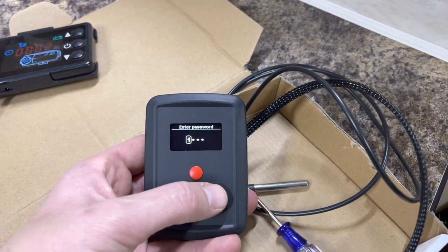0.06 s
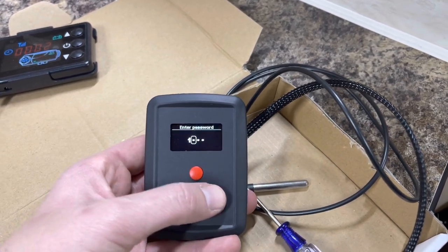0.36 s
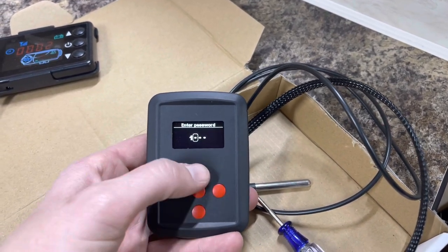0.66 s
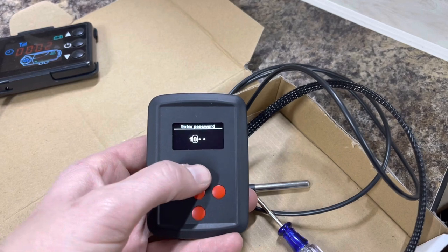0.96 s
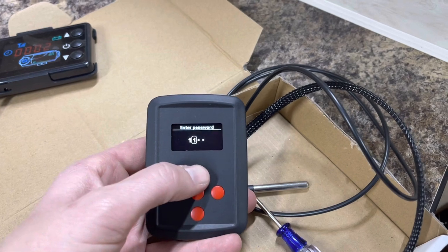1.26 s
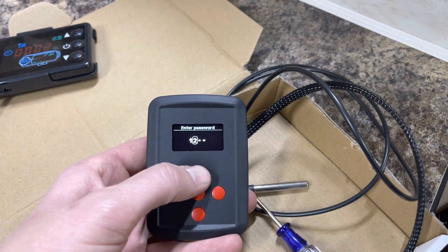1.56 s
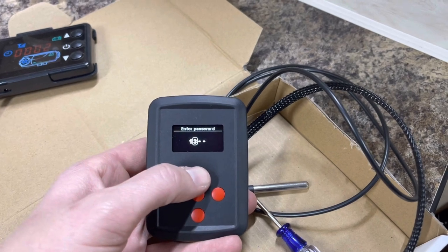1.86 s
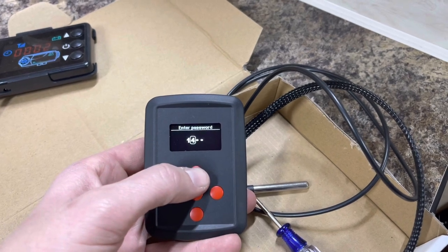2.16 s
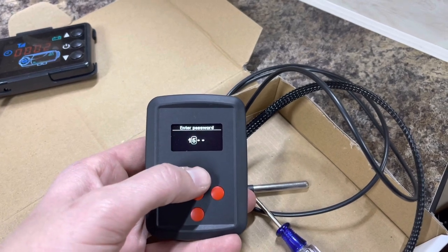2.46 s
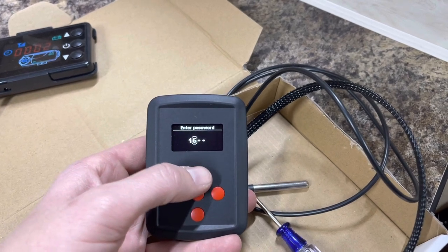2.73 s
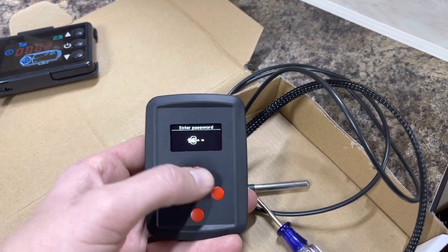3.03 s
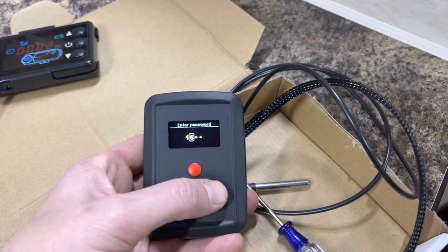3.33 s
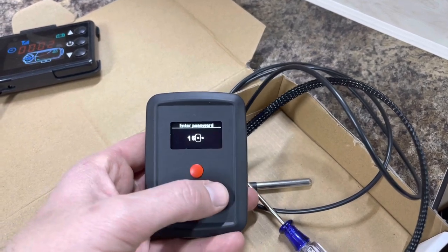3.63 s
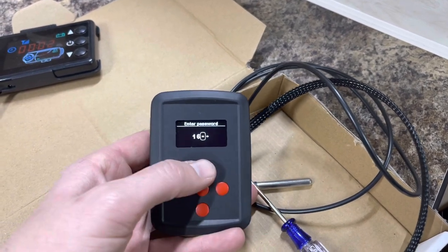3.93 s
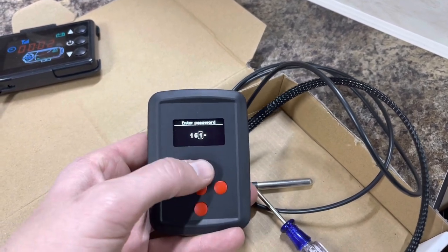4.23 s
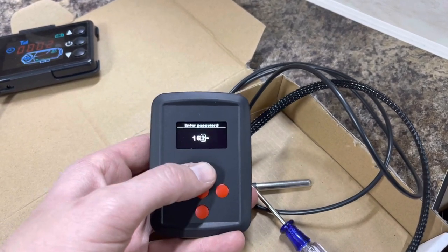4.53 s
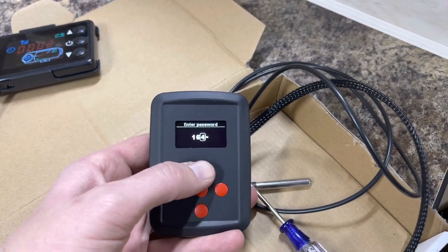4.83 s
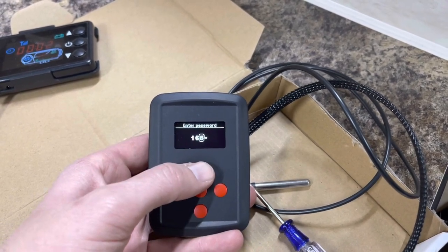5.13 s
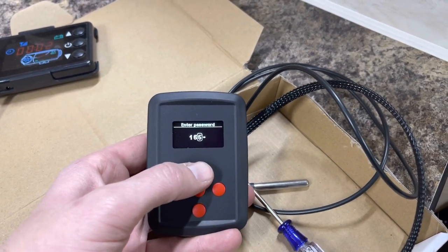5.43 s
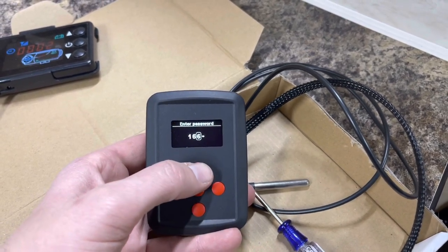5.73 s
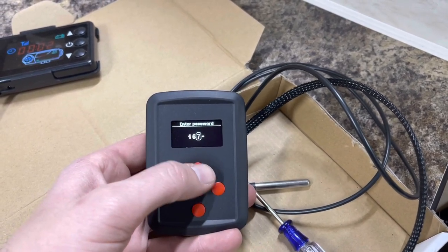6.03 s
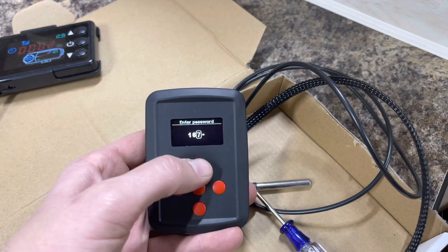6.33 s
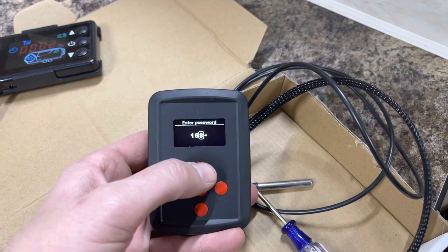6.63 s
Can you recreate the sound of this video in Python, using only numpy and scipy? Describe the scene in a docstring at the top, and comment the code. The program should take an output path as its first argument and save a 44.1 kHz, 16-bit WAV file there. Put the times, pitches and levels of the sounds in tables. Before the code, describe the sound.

A thumb works the small buttons of a handheld plastic controller, close to the microphone. A couple of softer clicks lead into a run of crisp press-and-release pairs. About halfway there is a short break with lighter clicks and faint finger rubbing, then a quicker run follows and slows toward the end. The clicks echo briefly in a small room over a faint, steady low machine hum.

```python
"""Small buttons click as a thumb works a handheld plastic controller above a cardboard sheet.
Under each button a metal dome flips: a snap, then a stop about a millisecond later.
Both strike the hollow case and make it ring, on the way down and on the way back up.
Between runs of clicks the thumb slides to another button and the fingers bump the shell.
The clicks echo briefly in a small room, which a low machine hum fills."""
import sys
import numpy as np
from scipy import signal
from scipy.fft import rfft, irfft, next_fast_len
from scipy.io import wavfile
from scipy.ndimage import uniform_filter1d

SR = 44100
rng = np.random.default_rng(int(sys.argv[2]) if len(sys.argv) > 2 else 0)


def to_wav(sig):
    """Store sig (one row per channel, or 1-D mono) as 16-bit WAV at the path in sys.argv[1].

    Samples outside -1..1 are clipped; the rate is SR.
    """
    pcm = np.clip(np.atleast_2d(sig), -1, 1) * 32767
    pcm = np.round(pcm).astype(np.int16)
    wavfile.write(sys.argv[1], SR, pcm.T)  # frames by channels


N = 303849
TIME = np.arange(N) / SR
CLICK_SAMPLES, RUB_SAMPLES = 4096, 16384

# The upper button going down: start_s, level_db, brightness_db_per_octave
BUTTON_PRESSES = [(.7217, -1.5, 0.6), (.9702, -5, -0.5), (1.2436, -3, -0.5), (1.5326, -2.5, -0.2),
                  (1.9044, -3, -0.5), (2.3002, -3.5, 0), (2.8804, -2.5, -0.4), (3.8783, -1.15, -0.3),
                  (4.1126, -2.1, -0.5), (4.3009, -2, 0), (4.529, -2.5, -1), (4.73, -2, -0.1),
                  (5.0681, -3.5, 0), (5.3766, -3.5, -0.5), (5.8485, -3, -0.3), (6.3898, -2.5, -0.6)]
# The upper button springing back: start_s, level_db, brightness_db_per_octave
BUTTON_RELEASES = [(.855, 1.3, 0.1), (1.102, -1.3, 1.4), (1.3397, 1.4, -0.54), (1.6713, -1, -0.85),
                   (2.0883, -1, -1.4), (2.4605, 0.8, 0.4), (3.003, 0.5, 1.95), (4.0193, -0.04, 0.1),
                   (4.2138, 2.5, 0.5), (4.431, .5, 1), (4.6436, 1.3, -0.8), (4.857, 1.3, 0.5),
                   (5.2267, -0.6, 0.5), (5.5089, 1.76, 0.4), (5.984, -0.5, 1.8)]
# Softer clicks around the side button: start_s, level_db, brightness_db_per_octave
SIDE_BUTTON_CLICKS = [(0.1333, -8.5, 0), (.2988, -16.5, -1.8), (3.4484, -9, .5), (3.6029, -23, -3),
                      (3.655, -11.5, -1.4)]
# Thin, bright clicks of a button let up slowly: start_s, level_db, brightness_db_per_octave
SLOW_RELEASES = [(3.1422, -10, 0), (6.5404, -13, -1.6)]
# The two hits in a click, snap then stop (harder is brighter): delay_s, level_db, hardness_hz
PRESS_HITS = [(.00014, 6.3, 9200), (.00119, 10.4, 9300)]
RELEASE_HITS = [(.0001, 13.7, 2900), (.00115, 17.6, 3090)]
# The tone that each kind of click gives the case: pitch_hz, gain_db
PRESS_TONE = [(800, 1.5), (1300, 1.5), (3000, -0.5), (4400, 0.5), (5100, 2.5), (6000, 4), (10500, 1),
              (13000, 2.5)]
RELEASE_TONE = [(800, -4), (1300, -2.5), (3000, 0), (4500, 0), (6000, -2.1), (10500, -3)]
SIDE_TONE = [(700, 10), (1100, -4), (2400, 1), (4500, -3.5), (6000, 1.5), (10500, -7)]
SLOW_TONE = [(700, 8), (1300, -3.5), (2400, 5), (3700, 3.5), (6000, -4.5), (8500, -4), (10500, 5),
             (13500, 6)]
# The notes the plastic case rings at: pitch_hz, level_db, ring_s (time to fade by 60 dB)
CASE_NOTES = [(1040, -52, .036), (1320, -41.5, .023), (1670, -53.5, .017), (2400, -46.5, .025),
              (2840, -58, .03), (3180, -35.5, .014), (3545, -29.5, .0085), (4190, -41.5, .024),
              (4850, -36.5, .014), (5480, -34, .013), (6050, -33, .0099), (6260, -34.5, .012),
              (6700, -43, .018), (7270, -33, .016), (8084, -37.5, .014), (8996, -28, .012),
              (9980, -30.5, .011), (10260, -29, .013), (11070, -28.5, .012), (11860, -35.5, .012),
              (12986, -40.5, .009), (14860, -42, .007)]

# The thumb slides over the case between buttons: middle_s, length_s, level_db, pitch_hz
THUMB_SLIDES = [(0.333, 0.06, -73.5, 1390), (0.39, 0.04, -69.5, 3020), (0.564, 0.026, -75.5, 4500),
                (3.128, 0.092, -69.5, 1700), (3.164, 0.065, -60, 885), (3.164, 0.029, -59, 4800),
                (3.352, 0.078, -65, 2070), (3.684, 0.035, -60, 1250), (3.778, .06, -65.5, 2930),
                (3.915, 0.044, -69, 2380), (6.585, 0.015, -66, 5070)]
# The grip shifts and fingers bump the shell: middle_s, length_s, level_db, pitch_hz, width_octaves
FINGER_BUMPS = [(3.057, 0.0038, -41.5, 990, .21), (3.312, 0.04, -58, 416, 1), (3.693, .022, -53, 342, 0.15)]
# The thumb brushes a loose key cap: middle_s, level_db
KEY_CAP_TICKS = [(2.707, -66.5), (3.12, -59), (3.239, -73.5), (3.51, -69), (6.337, -68.5)]

# Echoes off the hand and the table: delay_s, level_db
CLOSE_ECHOES = [(.00173, -14.5), (.00253, -23), (.00563, -26)]
# The tone of the room's echo: pitch_hz, gain_db
ROOM_TONE = [(400, -5), (820, -9.5), (1020, 4.5), (1300, -3), (2000, -13.5), (2600, -5.5), (3500, 0),
             (7000, -3), (11000, 2.5), (12500, -10.5), (14000, -25.5)]
# The machine's hum: pitch_hz, level_db
HUM_NOTES = [(172, -61), (321.5, -71.5), (532, -82), (635, -87)]
# The low background dips a little, then swells for a moment: time_s, gain_db
HUM_SWELL = [(0, 0), (3.7, -1.6), (4.2, 2), (4.8, 2), (5.15, 0), (6.89, 0)]
# The room's rumble and hiss: pitch_hz, level_db (per hertz of width)
ROOM_NOISE = [(20, -104), (32, -84.5), (41, -69.5), (70, -74), (135, -78), (200, -77), (270, -89),
              (420, -97), (780, -110), (1000, -109), (1400, -119), (2400, -119.5), (5000, -126),
              (11500, -125.5), (13000, -142)]

# How much louder close sounds are on the left than on the right: pitch_hz, left_minus_right_db
SIDE_BALANCE = [(200, -.3), (400, 4), (620, -1), (860, 7), (1250, -3), (1600, 1), (2450, 2), (3200, -3),
                (3500, 4), (4100, 0), (5000, -4), (5500, 0)]
# How far the right side lags the left: pitch_hz, lag_radians
RIGHT_LAG = [(250, 0), (500, -.6), (800, .1), (1150, -.55), (1700, 0), (2600, .4), (3000, 1.4), (3800, .75),
             (4400, 1.3), (4900, 3.1), (5300, 5.2), (6100, 6.3), (9000, 9.4), (12300, 12.5), (16000, 15.5)]
# How alike left and right are for sound from all around: pitch_hz, likeness (0 to 1)
SIDE_LIKENESS = [(60, .998), (170, .99), (340, .88), (500, .4), (700, 0), (1300, 0), (1750, .85),
                 (2800, .2), (4200, .5), (5300, .6), (5900, .98), (7300, .7), (9000, .98), (10800, .72),
                 (12000, .9), (14000, .2)]


def button(clicks, hits, tone, dome_db, dome_hz, dome_ring_s, knock_db, knock_hz, creak_db):
    """A metal dome flips; its snap and stop strike the case. Returns the sound and the force."""
    sound, forces = np.zeros(N), np.zeros(N)
    lead = CLICK_SAMPLES // 4
    tap = signal.unit_impulse(CLICK_SAMPLES, lead)
    for start_s, level_db, brightness in clicks:
        travel = 1 + 0.018 * rng.standard_normal()  # the button never moves at quite the same speed
        force = filtered(tap, lambda hz: sum(
            from_db(db) * delay(hz, delay_s * travel) / (1 + 1j * hz / hardness_hz) ** 2
            for delay_s, db, hardness_hz in hits))
        early = round(rng.uniform(.008, .015) * SR)
        force = force + from_db(creak_db) * np.roll(force, -early)  # a faint tick before the dome gives
        burst = ring(tap, dome_hz, dome_ring_s)
        dome = from_db(dome_db) * ring(burst, dome_hz, dome_ring_s)  # ringing twice softens the start
        # The shell under the button knocks, damped by the hand.
        knock = from_db(knock_db) * ring(force, knock_hz, ring_s=0.0076)
        click_tone = [(hz, level_db + db + brightness * np.log2(hz / 3500)) for hz, db in tone]
        start = round(start_s * SR) - lead
        add(sound, with_tone(plastic_case(force) + dome + knock, click_tone), start)
        add(forces, with_tone(force, click_tone), start)
    return np.array([sound, forces])


def plastic_case(force, spread_db=1.0):
    """The hollow case rings at many notes at once, each a little louder or softer every time."""
    changes_db = spread_db * rng.standard_normal(len(CASE_NOTES))
    return sum((-1) ** k * from_db(db + changes_db[k]) * ring(force, hz, ring_s)
               for k, (hz, db, ring_s) in enumerate(CASE_NOTES))


def handling():
    """The hand moves on the controller: soft slides, dull bumps and tiny ticks."""
    touches = [(middle_s, db, skin_rub(length_s, hz, octaves=.85, case_db=-13.5))
               for middle_s, length_s, db, hz in THUMB_SLIDES]
    touches += [(middle_s, db, skin_rub(length_s, hz, octaves, case_db=-35))
                for middle_s, length_s, db, hz, octaves in FINGER_BUMPS]
    touches += [(middle_s, db, skin_rub(length_s=0.004, pitch_hz=2300, octaves=1.0, case_db=-6))
                for middle_s, db in KEY_CAP_TICKS]
    out = np.zeros(N)
    for middle_s, db, sound in touches:
        add(out, from_db(db) * sound, round(middle_s * SR) - RUB_SAMPLES // 2)
    return out


def skin_rub(length_s, pitch_hz, octaves, case_db, grain_db=3.0):
    """Skin sticks and slips on the plastic in one grainy swell, and the case rings along."""
    t = (np.arange(RUB_SAMPLES) - RUB_SAMPLES // 2) / SR
    grip = uniform_filter1d(rng.standard_normal(RUB_SAMPLES), size=150)
    slips = rng.standard_normal(RUB_SAMPLES) * from_db(grain_db * grip / grip.std())
    swell = np.exp(-2 * (t / length_s) ** 2)
    skin = band(slips, pitch_hz, octaves) * swell
    sound = skin + from_db(case_db) * plastic_case(slips * swell)
    return sound * np.linalg.norm(swell) / np.linalg.norm(sound)


def close_sound(sound):
    """Sound arrives straight and off the hand and table; each pitch leans left or right."""
    echoed = filtered(sound, lambda hz: 1 + sum(from_db(db) * delay(hz, s) for s, db in CLOSE_ECHOES))
    return filtered(echoed, lambda hz: from_db(np.outer([1, -1], at_hz(SIDE_BALANCE, hz)) / 2))


def room_echo(force, near_ring_s=.085, far_ring_s=.32, near_db=-20.5, far_db=-37.5, rise_s=0.0018):
    """Each click spreads all round: a quick scatter off nearby things, then the room's faint tail."""
    t = TIME[:SR // 3]
    rise = 1 - np.exp(-(t / rise_s) ** 4)
    near, far = [from_db(-60 * t / ring_s) * rise for ring_s in (near_ring_s, far_ring_s)]
    fade = np.hypot(from_db(near_db) * near / np.linalg.norm(near),
                    from_db(far_db) * far / np.linalg.norm(far))
    paths = noise_all_around(N + len(t))
    out = np.zeros((2, N))
    for start_s, *_ in [*BUTTON_PRESSES, *BUTTON_RELEASES, *SIDE_BUTTON_CLICKS, *SLOW_RELEASES]:
        start = round(start_s * SR) - 64
        blow = force[start:start + 256]
        for side in range(2):
            # The hand keeps moving, so every click scatters along new paths.
            echo = fade * paths[side, start:start + len(t)]
            add(out[side], signal.fftconvolve(blow, echo), start)
    return with_tone(out, ROOM_TONE)


def hum_and_hiss(waver_depth=0.32, waver_hz=4):
    """A machine's hum wavers over the room's rumble and hiss; the low end swells once."""
    out = with_tone(noise_all_around(N), ROOM_NOISE) * np.sqrt(SR / 2)
    for pitch_hz, db in HUM_NOTES:
        waver = filtered(rng.standard_normal(N), lambda hz: np.exp(-(hz / waver_hz) ** 2))
        waver = waver_depth * waver / waver.std()
        phase = 2 * np.pi * pitch_hz * TIME + 2 * waver[::-1]  # the pitch wanders a little too
        out += np.sqrt(2) * from_db(db) * (1 + waver) * np.sin(phase)
    swell = from_db(np.interp(TIME, *np.transpose(HUM_SWELL)))
    return out + (swell - 1) * band(out, pitch_hz=192, octaves=0.37)


def noise_all_around(samples):
    """Noise from every direction, partly alike on the left and the right."""
    shared, apart = rng.standard_normal((2, samples))
    shared = filtered(shared, lambda hz: np.sqrt((1 + at_hz(SIDE_LIKENESS, hz)) / 2))
    apart = filtered(apart, lambda hz: np.sqrt((1 - at_hz(SIDE_LIKENESS, hz)) / 2))
    return np.array([shared + apart, shared - apart])


def lag_right(pair):
    """The right side is slightly out of step with the left, by an amount that depends on pitch."""
    left, right = pair
    return np.array([left, filtered(right, lambda hz: np.exp(-1j * at_hz(RIGHT_LAG, hz)))])


def ring(force, pitch_hz, ring_s):
    """A tap starts one pure note, which fades by 60 dB in ring_s."""
    fade = from_db(-60 / (ring_s * SR))
    turn = 2 * np.pi * pitch_hz / SR
    return signal.lfilter([0, np.sin(turn)], [1, -2 * fade * np.cos(turn), fade * fade], force + 1e-18)


def filtered(sound, gain_at):
    """Multiply each frequency in a sound by gain_at(hz)."""
    size = next_fast_len(sound.shape[-1] + CLICK_SAMPLES)
    hz = np.arange(size // 2 + 1) * SR / size
    return irfft(rfft(sound, size) * gain_at(hz), size)[..., :sound.shape[-1]]


def with_tone(sound, table):
    """Turn pitches up or down by a table of pitch_hz, gain_db."""
    return filtered(sound, lambda hz: from_db(at_hz(table, hz)))


def band(sound, pitch_hz, octaves):
    """Keep the part of a sound around one pitch."""
    return filtered(sound, lambda hz: np.exp(-.5 * (np.log2((hz + 1) / pitch_hz) / octaves) ** 2))


def delay(hz, seconds):
    """The filter gain that makes a sound arrive later."""
    return np.exp(-2j * np.pi * hz * seconds)


def at_hz(table, hz):
    """Read between a table's rows, with octaves evenly spaced."""
    pitches, values = np.transpose(table)
    return np.interp(np.log(hz + 1e-6), np.log(pitches), values)


def from_db(db):
    """Turn decibels into a multiplier."""
    return 10 ** (np.asarray(db) / 20)


def add(out, sound, start):
    """Mix a sound into out, beginning at sample start."""
    out[start:start + len(sound)] += sound[:len(out) - start]


def scene():
    """Four kinds of button click, with handling noise, the room's echo and the hum."""
    down = button(BUTTON_PRESSES, PRESS_HITS, PRESS_TONE, dome_db=-42.5, dome_hz=4243,
                  dome_ring_s=.0067, knock_db=-49.5, knock_hz=445, creak_db=-45)
    up = button(BUTTON_RELEASES, RELEASE_HITS, RELEASE_TONE, dome_db=-44, dome_hz=4216,
                dome_ring_s=.0074, knock_db=-59.5, knock_hz=426, creak_db=-42.5)
    side = button(SIDE_BUTTON_CLICKS, PRESS_HITS, SIDE_TONE, dome_db=-42.5, dome_hz=3740,
                  dome_ring_s=.0066, knock_db=-49, knock_hz=1830, creak_db=-44)
    slow = button(SLOW_RELEASES, PRESS_HITS, SLOW_TONE, dome_db=-36.5, dome_hz=3840,
                  dome_ring_s=.0038, knock_db=-51.5, knock_hz=1800, creak_db=-39)
    clicks, force = down + up + side + slow
    return lag_right(close_sound(clicks + handling()) + room_echo(force) + hum_and_hiss())


def record(dry):
    """Cut off the very highest treble steeply."""
    cutoff_hz = 16300
    return signal.sosfiltfilt(signal.ellip(10, .05, 60, cutoff_hz, fs=SR, output="sos"), dry)


dry = scene()
out = record(dry)
to_wav(out)
```